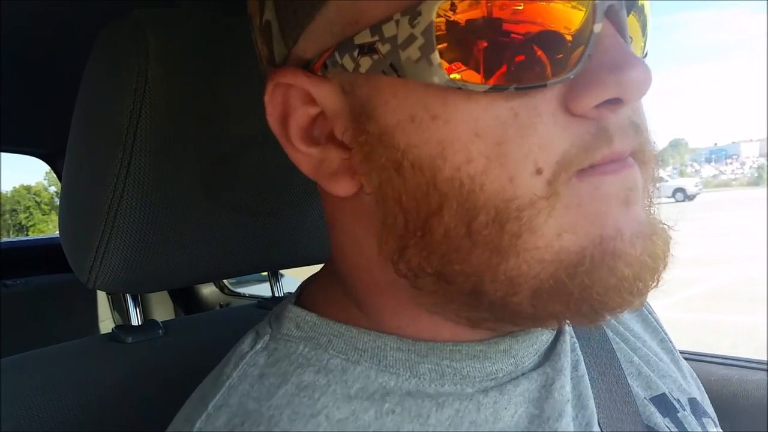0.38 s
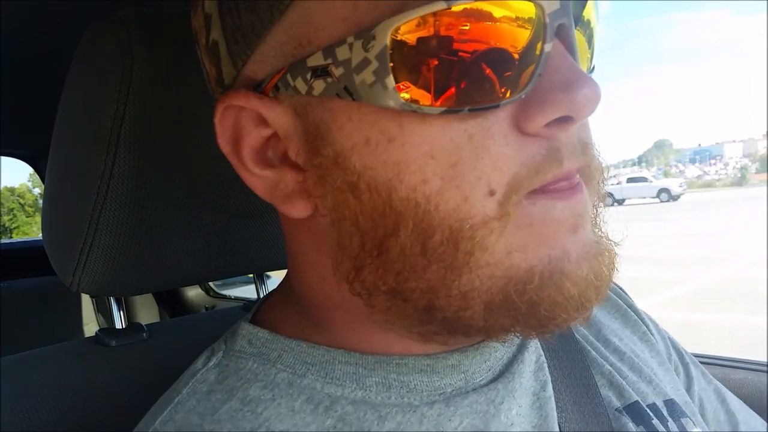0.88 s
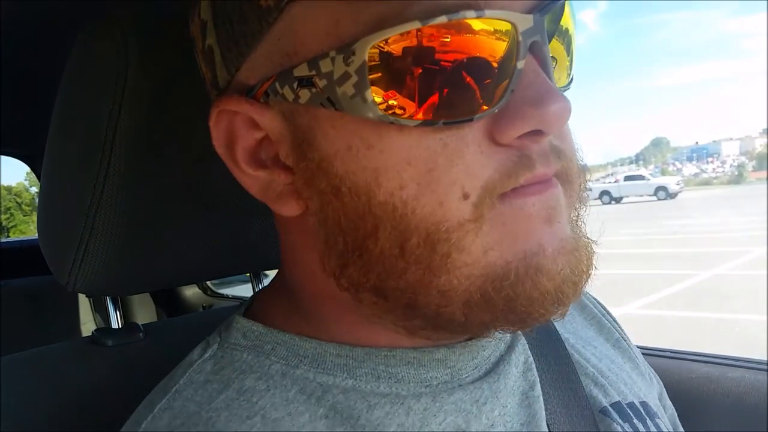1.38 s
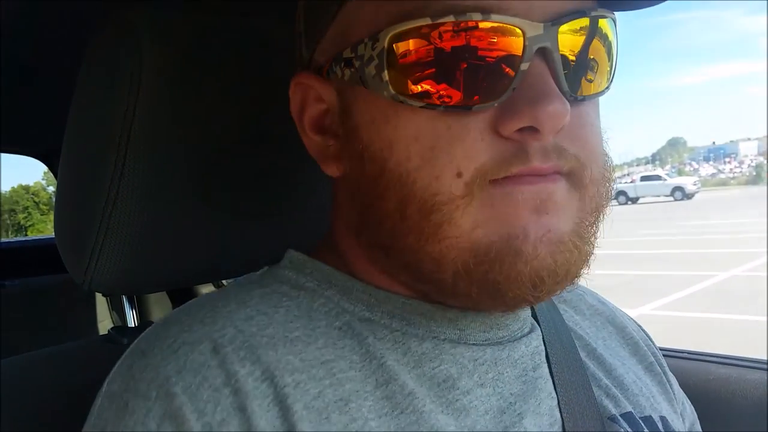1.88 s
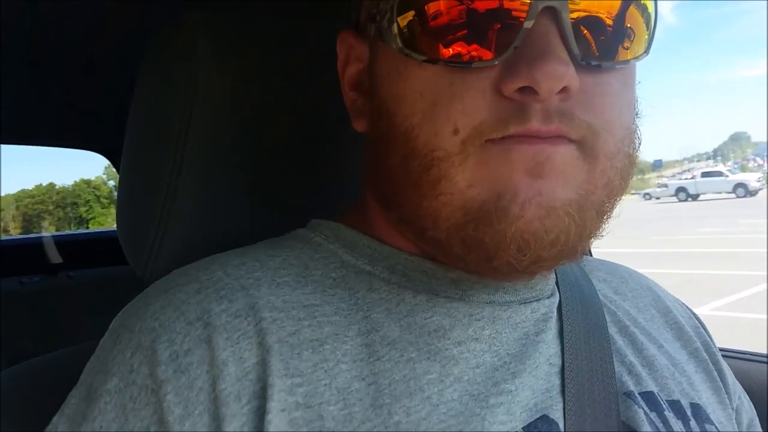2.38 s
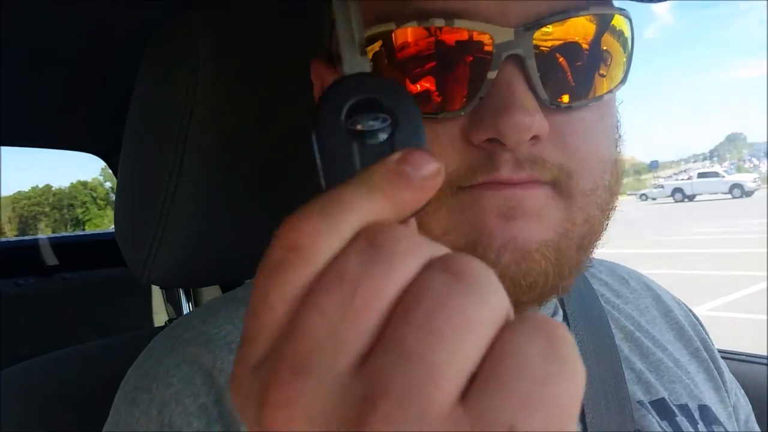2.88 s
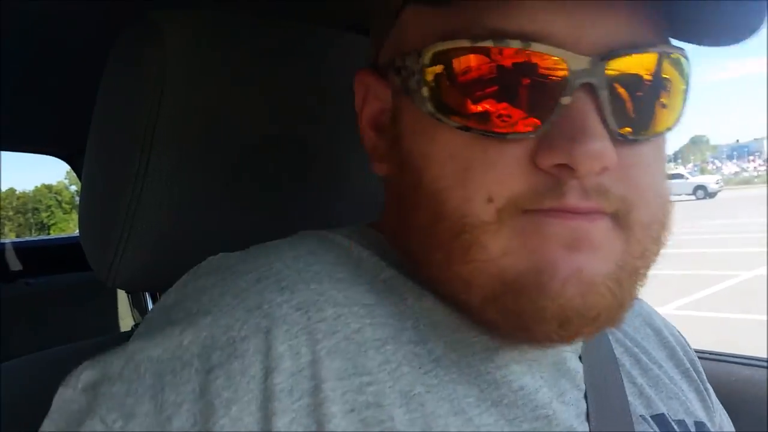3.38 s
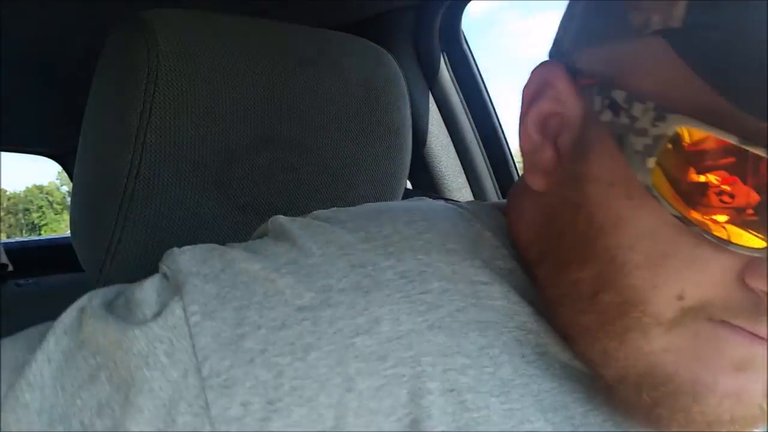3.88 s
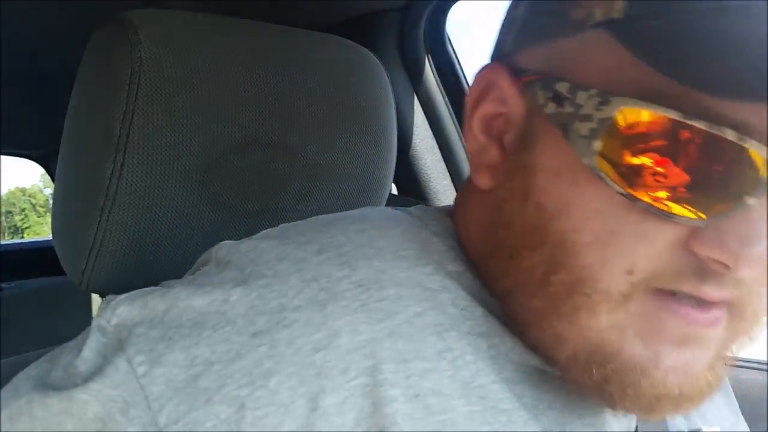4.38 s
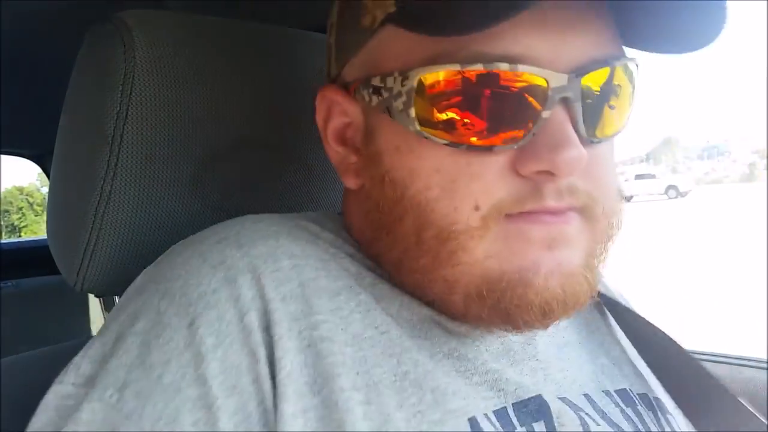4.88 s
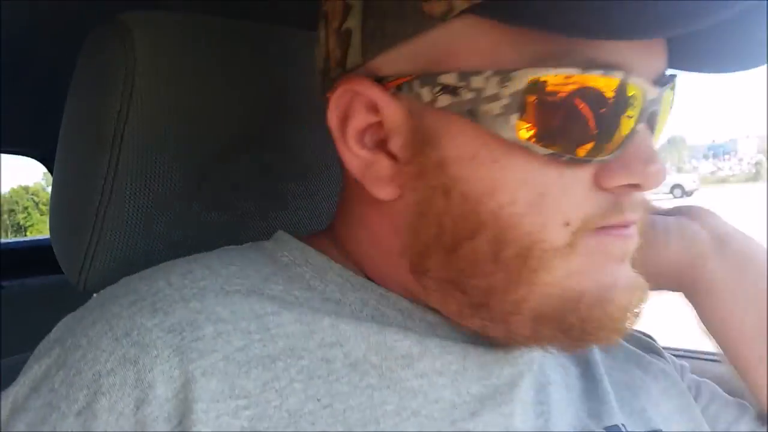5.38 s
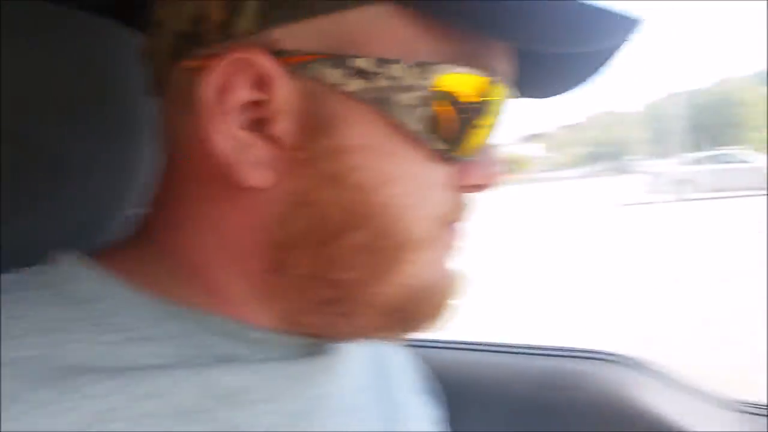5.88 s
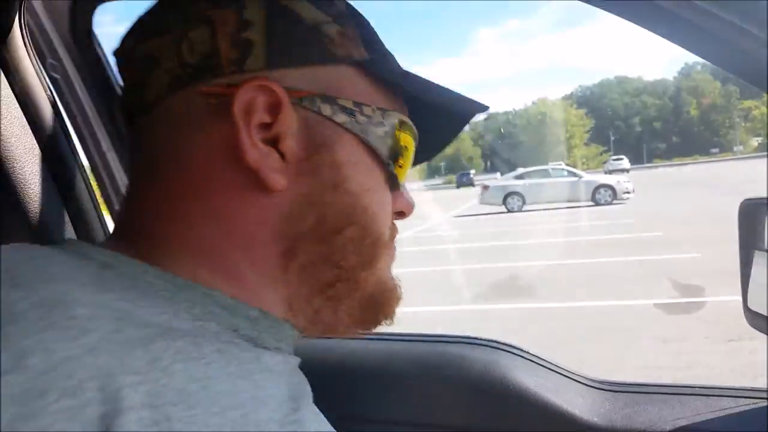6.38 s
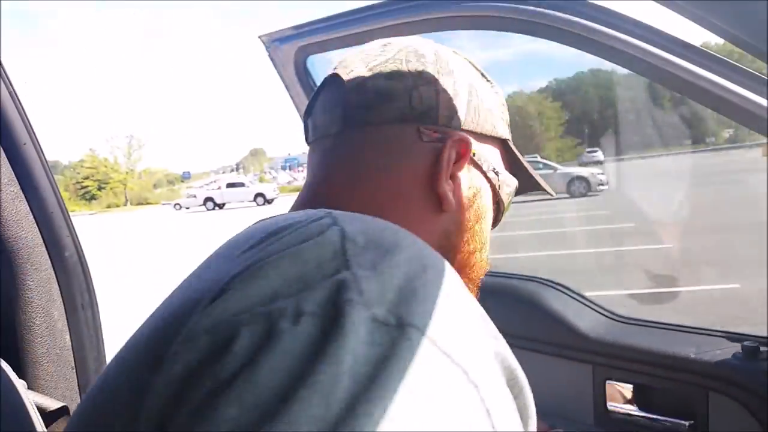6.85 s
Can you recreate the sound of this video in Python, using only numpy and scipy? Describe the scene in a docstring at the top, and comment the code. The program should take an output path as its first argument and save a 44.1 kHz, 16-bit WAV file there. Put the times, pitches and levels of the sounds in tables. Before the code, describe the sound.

Low rumble and wind buffeting in a parked truck cab fade to quiet, then clicks, knocks, a loud buckle clunk and a door latch opening.

```python
"""A low rumble inside a parked truck cab, with air buffeting the right of two phone ports, dies away first.
Trim, belt and latch click and knock as someone shifts, the belt buckle jumps free, cloth hisses near the right
port, and the door latch lets go. Boom, seat rustle, cloth and cab air are filtered noise under level curves;
puffs are short pressure swings; knocks, buckle and small parts are decaying modes; clicks are noise bursts."""
import sys
import numpy as np
from scipy import signal
from scipy.fft import rfft, irfft
from scipy.io import wavfile
from scipy.ndimage import uniform_filter1d, minimum_filter1d

SR = 44100
rng = np.random.default_rng(int(sys.argv[2]) if len(sys.argv) > 2 else 0)


def wrap_up_sound(samples):
    """Save the sound to the file named by the first command line argument, as 16-bit audio."""
    columns = np.atleast_2d(samples).T
    # keep every value between -1 and 1, then stretch to whole-number steps
    tamed = np.clip(columns, -1, 1)
    steps = np.round(tamed * 32767).astype(np.int16)
    wavfile.write(sys.argv[1], SR, steps)


def linear_from_db(decibels):
    """Turn decibels (scalar or array-like) into linear amplitude factors; 0 gives 1."""
    return 10 ** (np.asarray(decibels, float) / 20)


N = 319284   # samples


def rms_one(x):
    """Scales a signal to rms 1."""
    return x / np.sqrt(np.mean(x ** 2) + 1e-20)


def in_time(rows):
    """Draws each column of a table as a curve over the scene, straight between its points."""
    time_s, *columns = np.transpose(rows)
    return [np.interp(np.arange(N) / SR, time_s, column) for column in columns]


def at_hz(points, hz):
    """Reads a spectrum table, straight between its points on a log frequency axis."""
    points = np.array(points)
    return np.interp(np.log(hz), np.log(np.maximum(points[:, 0], 1)), points[:, 1])


def coloured(x, spectrum, tilt=((1, 0), (2, 0)), share=0, size=8192):
    """Causal (minimum-phase) filter with the given spectrum; unit gain for white noise before the tilt."""
    hz = np.maximum(np.arange(size // 2 + 1) * SR / size, 1)
    level_db = np.maximum(at_hz(spectrum, hz), -90)
    level_db = level_db - 10 * np.log10(np.mean(linear_from_db(2 * level_db)))
    level_db = level_db + share * at_hz(tilt, hz)
    # folding the cepstrum onto positive time gives minimum phase
    cepstrum = irfft(np.log(linear_from_db(level_db)))
    cepstrum[1:size // 2] *= 2
    cepstrum[size // 2 + 1:] = 0
    impulse = irfft(np.exp(rfft(cepstrum)))
    return signal.fftconvolve(x, impulse)[:N]


def drift(rate_hz):
    """Slow random wander of rms 1: noise through two equal poles, drawn at every 40th sample."""
    r = np.exp(-80 * np.pi * rate_hz / SR)
    noise = rng.standard_normal(N // 40 + 2002)
    slow = signal.lfilter([1], [1, -2 * r, r * r], noise)[2000:]
    return np.interp(np.arange(N) / 40, np.arange(len(slow)), rms_one(slow))


def panned(pan_db):
    """Left and right gains of constant total power; pan_db is L-R."""
    left_power = 1 / (1 + linear_from_db(-2 * np.asarray(pan_db)))
    return np.sqrt(2 * np.array([left_power, 1 - left_power]))


def noise_pair(alike):
    """Two white noises that share the power fraction alike."""
    common, own = rng.standard_normal(N), rng.standard_normal((2, N))
    return np.sqrt(alike) * common + np.sqrt(1 - alike) * own


def ring(x, hz, t60_s):
    """Two-pole resonator: a unit click sets a decaying sine of starting height 1 ringing."""
    r, w = linear_from_db(-60 / (t60_s * SR)), 2 * np.pi * hz / SR
    return signal.lfilter([0, np.sin(w)], [1, -2 * r * np.cos(w), r * r], x)


def add(out, start_s, sound, pan_db):
    """Lays one event into both ports."""
    at = round(start_s * SR)
    out[:, at:at + sound.shape[-1]] += panned(pan_db)[:, None] * sound[..., :N - at]


# where the phone faces, as the side on which the cab sounds: time_s, left_minus_right_db
FACING = [(0.0, -12.5), (0.8, -8), (1.0, -1), (2.45, 2.5), (2.7, 3), (3.8, 0), (4.1, 9.5), (4.6, 6.5),
          (4.75, -5), (5.25, 2), (5.35, 12), (6.22, 13), (6.3, 1), (6.75, -0.5), (6.8, 4), (7.24, 3.5)]


def facing_db():
    """L-R level of cab sounds as the phone turns."""
    return in_time(FACING)[0]


def swell(top_s, level_db, rise_s, fall_s, drop_db=20):
    """Power that climbs and sinks evenly in dB, by drop_db over each of rise_s and fall_s."""
    t = np.arange(N) / SR - top_s
    return linear_from_db(2 * (level_db - drop_db * np.maximum(-t / rise_s, t / fall_s)))


# steady boom, dying away to a murmur and back when the door opens: time_s, level_db
BOOM_LEVEL = [(0.0, -25.5), (0.85, -33), (1.3, -36.5), (1.57, -41.5), (2.5, -47), (3.08, -58.5), (3.2, -49),
              (3.65, -73), (4.05, -69), (4.45, -62), (4.7, -55), (5.26, -50), (5.32, -70), (5.5, -52),
              (5.92, -58.5), (6.2, -70), (6.4, -35.5), (7.24, -45)]
# boom under a gust or a shift of weight: top_s, level_db, rise_s, fall_s, left_minus_right_db
BOOM_SWELLS = [(0.14, -22, 0.19, 0.42, -24), (0.34, -12, 0.018, 0.034, -32), (0.46, -18, 0.16, 0.058, -27),
               (0.579, -16, 0.057, 0.042, -13), (0.66, -22.5, .1, 0.12, -22),
               (0.81, -23.5, 0.19, 0.084, -25), (0.99, -21.5, 0.17, 0.22, -2), (1.27, -26.5, 0.4, 0.22, -6),
               (1.43, -22, 0.039, 0.083, -28), (2.438, -29.5, 0.23, 0.052, -1.5),
               (3.37, -44.5, .08, 0.43, 0), (3.85, -40.5, 0.18, 0.97, -0.5), (4.23, -39.5, 0.2, 0.078, 10),
               (4.419, -32, 0.086, 0.036, 5), (4.58, -39, 0.13, 0.18, 3.5), (5.379, -31.5, 0.027, 0.07, 14),
               (5.97, -47.5, 0.02, .24, -2), (6.33, -20, 0.042, 0.07, 0), (6.63, -34, 0.64, 0.2, -2),
               (7.0, -36, 0.18, 0.23, 13)]


def boom_control(turn_db, turn_share=0.56):
    """Level and side of the boom: the steady part plus every swell, added as powers in each port."""
    power = linear_from_db(2 * in_time(BOOM_LEVEL)[0]) * panned(turn_share * turn_db) ** 2
    for *shape, pan_db in BOOM_SWELLS:
        power = power + swell(*shape) * panned(pan_db)[:, None] ** 2
    level_db = 10 * np.log10(power.mean(axis=0))
    pan_db = 10 * np.log10(power[0] / power[1])
    return level_db, pan_db


# boom spectrum, relative: frequency_hz, density_db
RUMBLE_SPECTRUM = [(12, -23), (20, -7.5), (54, -3.5), (102, 3.5), (188, -8.5), (221, -10), (260, -16.5),
                   (340, -19), (570, -120)]


def rumble(level_db, pan_db, alike=0.44, steady=0.38, gain_db=-1.5):
    """Boom of the cab and buffeting air, partly own to each port; steadier in strength than plain noise."""
    pair = np.array([coloured(x, RUMBLE_SPECTRUM) for x in noise_pair(alike)])
    strength = np.sqrt(uniform_filter1d(pair ** 2, size=1300, axis=1) + 1e-3)
    return linear_from_db(level_db + gain_db) * panned(pan_db) * pair / strength ** steady


# strongest air puffs on the right port; edge is relative to swing: top_s, level_db, edge_db
AIR_PUFFS = [(0.08, -19, -20), (0.1357, -24.5, -3.5), (0.1608, -17.5, -28), (0.2395, -14, -11),
             (0.279, -15.5, -8.5), (0.334, -15.5, -10), (0.3558, -21.5, -1.5), (0.372, -18, -9),
             (0.4556, -13, -7.5), (0.5062, -29, -11), (0.5784, -19.5, -20), (0.6286, -17.5, -1),
             (0.6363, -14.5, 7.5), (0.663, -15.5, -8), (0.706, -22, -28), (0.7646, -21, -17),
             (0.7976, -20, -26), (0.807, -16.5, -5), (1.4144, -28, -32), (1.4411, -31.5, -35)]


def puffs(swing_hz=315, scatter=0.2, swing_s=0.0018, edge_hz=700, edge_s=0.00052, pan_db=-22):
    """Pressure spikes that build and collapse within a few swings, with a brighter edge at the top."""
    out, t = np.zeros((2, N)), np.arange(-600, 600) / SR
    # a weaker, duller puff just before and just after each
    flutter_s, flutter_db, flutter_edge_db = 0.0104, -10.5, -4.5
    gaps_s = flutter_s * rng.uniform(0.797, 1.4, (len(AIR_PUFFS), 2)) * [-1, 1]
    every = [*AIR_PUFFS]
    for (top_s, level_db, edge_db), pair_s in zip(AIR_PUFFS, gaps_s):
        for gap_s in pair_s:
            every.append((top_s + gap_s, level_db + flutter_db, edge_db + flutter_edge_db))
    for (top_s, level_db, edge_db), draw in zip(every, rng.standard_normal((len(every), 4))):
        swing = np.cos(2 * np.pi * swing_hz * (1 + scatter * draw[0]) * t + 0.5 * draw[1])
        swing = swing / (1 + (t / swing_s) ** 2)
        edge = np.cos(2 * np.pi * edge_hz * (1 + scatter * draw[2]) * t + 0.5 * draw[3])
        edge = edge / (1 + (t / edge_s) ** 2)
        add(out, max(top_s + t[0], 0), -linear_from_db(level_db) * (swing + linear_from_db(edge_db) * edge), pan_db)
    return out


# modes of the freed belt buckle: frequency_hz, level_db (relative), t60_s
BUCKLE_MODES = [(189, -14, 0.032), (413, 8.5, 0.017), (498, -9, 0.031), (750, -1, 0.028), (880, -11, 0.023),
                (1220, -19, 0.025), (1505, -19, 0.024), (2065, -43, 0.13), (3740, -43.5, 0.14),
                (3820, -29, 0.034)]


def buckle(start_s=5.3238, level_db=-0.5, pan_db=10, build_s=0.0019):
    """The steel tongue jumps free of its plastic housing; the ring builds over the first swings."""
    out, t = np.zeros((2, N)), np.arange(9000) / SR
    sound = np.zeros(len(t))
    for k, (hz, mode_db, t60_s) in enumerate(BUCKLE_MODES):
        sign = (-1) ** k
        sound += sign * linear_from_db(mode_db - 60 * t / t60_s) * np.sin(2 * np.pi * hz * t)
    sound *= 1 - np.exp(-(t / build_s) ** 2)
    add(out, start_s, linear_from_db(level_db) * sound / np.abs(sound).max(), pan_db)
    return out


# dull knocks on trim, seat and door; t60 is of the shaking:
# start_s, level_db, pitch_hz, trim_db (relative to the low part), t60_s
DULL_KNOCKS = [(0.16, -21.5, 177, -9, 0.085), (0.366, -22, 170, -26, 0.051), (0.519, -23, 244, -3, 0.054),
               (1.134, -20.5, 227, -18, 0.06), (1.24, -37.5, 167, 5.5, 0.032), (1.533, -33, 170, 0, 0.14),
               (1.734, -55, 218, 13.5, 0.058), (1.943, -41, 350, -7, 0.19), (2.186, -36.5, 236, -29, 0.054),
               (2.233, -36, 237, -6, 0.026), (2.263, -29.5, 224, -40, 0.083),
               (2.312, -24.5, 179, -43, 0.098), (2.675, -41, 222, -6.5, 0.12), (2.72, -53.5, 168, 8, 0.26),
               (3.1218, -29, 207, 4.5, 0.18), (3.353, -47, 182, -11, 0.22), (3.754, -42.5, 175, -23, 0.068),
               (3.809, -36, 179, 4, 0.11), (3.868, -33.5, 314, -6, 0.23), (3.908, -47, 348, 8, 0.099),
               (4.1, -42, 169, -6, 0.16), (4.183, -37.5, 203, -9, 0.1), (4.203, -43.5, 188, 0.5, 0.042),
               (4.227, -34.5, 164, -24, 0.042), (4.294, -49.5, 490, 4, 0.083),
               (4.398, -31.5, 239, 0.5, 0.068), (4.516, -44, 208, -1, 0.16), (4.597, -44.5, 194, -4, 0.073),
               (5.338, -32.5, 204, 0, 0.14), (5.391, -38.5, 250, -8, 0.058), (5.43, -47, 220, -10, 0.038),
               (5.553, -43, 191, -10, 0.059), (5.892, -50, 213, -2, 0.15), (6.209, -36.5, 230, -3.5, 0.085),
               (6.303, -23, 212, -9, 0.079), (6.322, -26.5, 168, -16, 0.1), (6.448, -39, 288, 4, 0.12),
               (6.47, -34, 337, -1.5, 0.16), (6.5, -37.5, 304, -2, 0.15), (6.532, -32, 236, -1, 0.098),
               (6.6035, -18.5, 216, -7, 0.1), (6.6165, -19.5, 188, -28, 0.16),
               (6.688, -34, 432, -20, 0.029), (6.744, -35.5, 170.4, -6, 0.044),
               (6.789, -34, 223, -20, 0.11), (6.998, -35.5, 95, -28, .07), (7.086, -32, 132, -17, 0.074)]
# damped trim modes: frequency_hz, level_db (relative), t60_s
TRIM_MODES = [(347, 6, 0.016), (534, 1.5, 0.033), (664, -1.5, 0.034), (770, 6, 0.021), (905, -4.5, 0.052),
              (1000, -17, 0.035), (1240, -21, 0.026), (1526, -8.5, 0.021)]


def knocks(turn_db, alike=0.68, rattle_db=-25, soft_hz=1300, own_share=0.27, thud_db=-12, thud_hz=100,
           tail_db=-16, tail_stretch=2.0, build_s=0.0021, gain_db=6.5):
    """One soft blow and a dying rattle drive the struck part, the damped trim modes and the boom of the cab."""
    out, t = np.zeros((2, N)), np.arange(14000) / SR
    n = len(t)
    soft = signal.butter(2, [80, soft_hz], "band", fs=SR, output="sos")
    draws = rng.standard_normal((len(DULL_KNOCKS), 3, n + len(TRIM_MODES)))
    for (start_s, level_db, pitch_hz, trim_db, t60_s), draw in zip(DULL_KNOCKS, draws):
        # the panels go on shaking faintly
        shake = linear_from_db(-60 * t / t60_s) + linear_from_db(tail_db - 60 * t / (tail_stretch * t60_s))
        rattle = np.sqrt(alike) * draw[0, :n] + np.sqrt(1 - alike) * draw[1:, :n]
        contact = rattle * shake * linear_from_db(rattle_db)
        contact[:, 0] = -1   # the blow
        contact = signal.sosfilt(soft, contact)
        struck = rms_one(ring(contact, pitch_hz, own_share * t60_s))
        thud = rms_one(ring(contact, thud_hz, t60_s))
        low = struck + linear_from_db(thud_db) * thud
        spot_db = 3 * draw[0, n:]   # every blow lands on another spot
        trim = sum(linear_from_db(mode_db + d) * ring(contact, hz, ring_s)
                   for (hz, mode_db, ring_s), d in zip(TRIM_MODES, spot_db))
        build = 1 - np.exp(-(t / build_s) ** 2)   # the contact takes a moment to close
        low, trim = low * build, trim * build
        sound = low / np.abs(low).max() + linear_from_db(trim_db) * trim / np.abs(trim).max()
        add(out, start_s, linear_from_db(level_db + gain_db) * sound, turn_db[round(start_s * SR)])
    return out


# small parts ringing once (key, belt fittings, door trim): start_s, level_db, pitch_hz, t60_s
SMALL_PARTS = [(0.522, -20, 520, 0.049), (1.134, -22.5, 523, 0.05), (0.516, -42, 5370, .03),
               (1.535, -32, 3740, 0.02), (2.495, -36.5, 2260, 0.032), (2.497, -32.5, 1880, 0.029),
               (3.126, -30, 514, 0.041), (3.1265, -17.5, 812, 0.044), (3.128, -16, 1052, 0.055),
               (3.129, -40, 3600, 0.045), (3.132, -34, 1420, 0.054), (4.396, -32, 810, 0.059),
               (4.398, -33, 3440, 0.026), (4.599, -38, 830, 0.078), (4.75, -48.5, 674, 0.29),
               (4.803, -48, 684, 0.22), (4.878, -48, 664, 0.38), (4.895, -45, 524, 0.22),
               (4.974, -37.5, 790, 0.1), (5.052, -42.5, 498, 0.08), (5.18, -45.5, 347, 0.33),
               (6.309, -26, 905, 0.055), (6.404, -42, 865, 0.28), (6.449, -31, 1060, .08),
               (6.468, -31, 495, 0.11), (6.535, -35, 746, 0.07), (6.604, -24, 720, 0.047),
               (6.665, -35, 443, 0.099), (6.744, -27.5, 600, 0.052), (6.744, -30, 880, 0.054),
               (6.784, -32, 616, 0.058), (6.898, -42, 464, 0.14), (6.96, -34.5, 520, 0.085),
               (7.021, -42.5, 499, 0.21), (7.081, -43, 562, 0.14), (7.14, -36, 490, 0.08),
               (6.686, -35, 893, .06)]


def pings(build_s=0.0019, pan_db=5.0):
    """One dying sine each, building over the first swings."""
    out, t = np.zeros((2, N)), np.arange(9000) / SR
    for (start_s, level_db, pitch_hz, t60_s), phase in zip(SMALL_PARTS, rng.random(len(SMALL_PARTS))):
        note = linear_from_db(level_db - 60 * t / t60_s) * np.sin(2 * np.pi * (pitch_hz * t + phase))
        add(out, start_s, note * (1 - np.exp(-(t / build_s) ** 2)), pan_db)
    return out


# bright clicks, each a rattle of contacts: start_s, level_db, low_db (gain of low part), ring_hz, length_s
BRIGHT_CLICKS = [(0.136, -36.5, -1, 1900, 0.013), (0.152, -30.5, -1.5, 2310, 0.021),
                 (0.346, -31.5, -1, 2090, 0.022), (0.5002, -20.5, -10, 2830, 0.011),
                 (0.511, -24.5, -6, 4430, 0.018), (0.576, -32, -1.5, 5030, 0.0049),
                 (0.939, -38.5, -3.5, 1930, 0.012), (1.0428, -26.5, -11, 4480, 0.017),
                 (1.071, -37, -2.5, 2010, 0.023), (1.127, -51, 5, 1920, 0.015),
                 (1.1986, -38, -11, 2660, 0.01), (1.2305, -26.5, -6.5, 2110, 0.014),
                 (1.459, -44, -26, 2500, 0.026), (1.497, -41, -5, 2500, 0.018),
                 (1.5134, -29.5, -4.5, 4200, 0.023), (1.534, -22.5, -2, 4000, 0.014),
                 (1.709, -51, 9, 2170, 0.023), (2.229, -52.5, 6.5, 2030, 0.012),
                 (2.493, -40.5, 0.5, 2150, 0.012), (2.767, -52, -16, 4150, 0.017),
                 (2.786, -47, -11, 3850, 0.025), (3.1249, -27.5, -0.5, 1960, 0.013),
                 (4.007, -45.5, -7, 4530, 0.02), (4.224, -47, -22, 3220, 0.0062),
                 (4.3936, -26.5, -2, 3370, 0.01), (4.398, -20.5, -11, 2460, 0.005),
                 (4.51, -47.5, 2, 1900, 0.016), (4.552, -39, -1.5, 3080, 0.007),
                 (5.137, -43.5, -8, 2120, 0.055), (5.284, -40.5, 2, 1940, 0.0091),
                 (5.3233, -41.5, 24.5, 2240, 0.0049), (5.375, -49.5, 10, 2600, 0.0036),
                 (6.203, -70, 18.5, 1960, 0.021), (6.236, -52, -5, 2850, 0.01),
                 (6.269, -48.5, -5, 2200, 0.013), (6.2997, -45.5, 1.5, 2050, 0.047),
                 (6.444, -45, 7, 2370, 0.05), (6.526, -46.5, 9.5, 3000, 0.016),
                 (6.6039, -23.5, 2, 3280, 0.0067), (6.609, -35, 3, 2860, 0.015),
                 (7.21, -50.5, 3, 2540, 0.034)]
# low part of a click, relative: frequency_hz, density_db
CLICK_LOW_SPECTRUM = [(600, 0), (1000, 7), (1500, -0.5), (2200, -1), (3000, 0), (3800, 1), (4800, -12.5),
                      (6000, -13.5), (8000, -47)]
# bright part of a click, relative: frequency_hz, density_db
CLICK_HIGH_SPECTRUM = [(2650, -46), (4500, -4.5), (5670, -6.5), (7470, -7.5), (8180, -6), (10800, 0.5),
                       (11500, -2.5), (12400, -2.5), (15300, -4), (16300, -11)]
# treble difference of the ports, also heard on cloth: frequency_hz, left_minus_right_db
PORT_TILT = [(4500, 20), (6500, 15.5), (8200, 5.5), (10500, -11), (13000, -7), (16000, 3)]


def clicks(grain_db=3.5, grain_s=0.001, alike=0.12, tail_db=-16, tail_s=0.018, rise_s=0.00068,
           ring_db=-25, ring_s=0.0086, low_pan_db=-3.0, high_pan_db=-16, gain_db=-9):
    """A burst of contacts rings a small part, holds briefly, then dies with a short cab tail."""
    low, high, t = np.zeros((2, N)), np.zeros((2, N)), np.arange(8000) / SR
    draws = rng.standard_normal((len(BRIGHT_CLICKS), 4, len(t)))
    for (start_s, level_db, low_db, hz, length_s), draw in zip(BRIGHT_CLICKS, draws):
        shape = np.minimum(t / rise_s, 1) * np.exp(-(t / length_s) ** 2)
        shape = shape + linear_from_db(tail_db) * np.exp(-t / tail_s)
        contacts = np.sqrt(alike) * draw[0] + np.sqrt(1 - alike) * draw[1:3]
        lumps = rms_one(uniform_filter1d(draw[3], size=round(grain_s * SR)))   # contacts come in clumps
        settle = np.minimum(t / length_s, 1)   # the first contact is firm, the later ones uneven
        burst = contacts * linear_from_db(grain_db * lumps * settle + level_db + gain_db) * shape
        add(high, start_s, burst, high_pan_db)
        add(low, start_s, linear_from_db(low_db) * (burst + linear_from_db(ring_db) * ring(burst, hz, ring_s)), low_pan_db)
    return np.array([coloured(a, CLICK_LOW_SPECTRUM) + coloured(b, CLICK_HIGH_SPECTRUM, PORT_TILT, side)
                     for a, b, side in zip(low, high, (0.5, -0.5))])


# how much the body stirs in the seat: time_s, level_db
STIR_LEVEL = [(0.0, -39), (0.16, -43.5), (0.6, -42.5), (1.19, -44), (1.45, -53.5), (2.3, -48), (2.7, -56.5),
              (3.15, -73), (3.27, -56), (3.77, -58), (4.01, -53), (4.44, -63.5), (4.64, -50.5), (5.4, -52),
              (5.53, -62.5), (6.05, -53.5), (6.23, -58), (6.51, -44), (7.04, -47.5), (7.24, -41)]
# rustle through the panels, relative: frequency_hz, density_db
BODY_SPECTRUM = [(71, -41), (120, -10.5), (156, -7.5), (220, -8.5), (265, -12), (445, -13.5), (530, -14),
                 (610, -17), (882, -16), (1170, -29.5), (1600, -31), (2080, -40), (3520, -120)]


def body(turn_db, alike=0.47, seat_pan_db=2, turn_share=0.48, gain_db=-2):
    """Seat and trim rustle under shifting weight: uneven noise through the panels."""
    level_db = in_time(STIR_LEVEL)[0]
    pan_db = seat_pan_db + turn_share * turn_db
    uneven = linear_from_db(2.68 * drift(45) + 3.0 * drift(10.9))
    pair = np.array([coloured(x * uneven, BODY_SPECTRUM) for x in noise_pair(alike)])
    return linear_from_db(level_db + gain_db) * panned(pan_db) * pair


# strokes of fabric: top_s, level_db, rise_s, fall_s
CLOTH_STROKES = [(0.75, -59, 0.043, 0.68), (0.97, -62, 0.72, 0.048), (1.43, -63, 0.26, 0.21),
                 (2.12, -65, 1.14, 0.77), (2.7, -75, 0.35, 0.43), (3.65, -60, 0.39, 0.59),
                 (3.95, -59, 0.39, 0.52), (4.62, -61, 0.13, 0.52), (4.82, -57.5, 0.28, 0.5),
                 (5.24, -66.5, 0.2, 0.47), (5.89, -71.5, 0.49, 0.53), (6.58, -48.5, 0.23, 0.34),
                 (6.8, -61.5, 0.35, 1)]
# fabric hiss, relative: frequency_hz, density_db
CLOTH_SPECTRUM = [(4120, -18.5), (7000, -7.5), (8060, -12.5), (9970, -4.5), (11200, -3.5), (13400, -5.5),
                  (15200, -3.5), (15800, -22), (16300, -37)]


def cloth(air_db, rest_db=-37, alike=0.23, flicker_db=1.5, pan_db=-16, gain_db=2.0):
    """Fabric sliding near the right port: flickering noise in strokes, over a rest level set by the cab air."""
    power = linear_from_db(2 * (air_db + rest_db)) + sum(swell(*row) for row in CLOTH_STROKES)
    level_db = 10 * np.log10(power)
    pair = noise_pair(alike) * linear_from_db(flicker_db * drift(39))
    pair = np.array([coloured(x, CLOTH_SPECTRUM, PORT_TILT, side) for x, side in zip(pair, (0.5, -0.5))])
    return linear_from_db(level_db + gain_db) * panned(pan_db)[:, None] * pair


# cab air: time_s, level_db
AIR_LEVEL = [(0.0, -60), (1.0, -61.5), (2.7, -62.5), (3.17, -69), (3.55, -59.5), (4.0, -61.5), (5.0, -59.5),
             (5.51, -70.5), (6.25, -71), (6.53, -55), (6.68, -60), (7.24, -59)]


def airflow_db():
    """Level of the cab air over time."""
    return in_time(AIR_LEVEL)[0]


# cab air, relative: frequency_hz, density_db
AIR_SPECTRUM = [(650, -26), (1100, 4), (1680, -1), (1990, 3.5), (2520, 1.5), (3120, 1.5), (3570, -3.5),
                (4310, 0), (5220, -7.5), (7220, -16), (8360, -13.5), (10100, -17.5), (11300, -9),
                (15100, -10), (16000, 1.5)]
# colour difference of the ports for air: frequency_hz, left_minus_right_db
AIR_TILT = [(1290, 3), (2380, -1), (4400, 11), (6500, 8), (8100, -0.5), (10500, -23.5), (13000, 0.5),
            (16000, -8)]


def air(level_db, alike=0.063, flicker_db=1.33, gain_db=3.5):
    """Smooth cab air as gently flickering noise; each port colours it in its own way."""
    pair = noise_pair(alike) * linear_from_db(flicker_db * drift(20.0))
    pair = np.array([coloured(x, AIR_SPECTRUM, AIR_TILT, side) for x, side in zip(pair, (0.5, -0.5))])
    return linear_from_db(level_db + gain_db) * pair


def scene():
    """All layers; sound reaches the left port a little late."""
    turn_db, air_db = facing_db(), airflow_db()
    cab = rumble(*boom_control(turn_db)) + puffs()
    cab = cab + buckle() + knocks(turn_db) + pings() + clicks()
    cab = cab + body(turn_db) + cloth(air_db) + air(air_db)
    left_lag = 21   # samples
    return np.array([np.pad(cab[0], (left_lag, 0))[:N], cab[1]])


def roll_off(x):
    """The treble ends steeply here."""
    return signal.sosfilt(signal.butter(12, 16970, fs=SR, output="sos"), x)


def record(dry):
    """A limiter lowers both ports ahead of peaks above its limit; then the top is cut steeply."""
    limit, look_ahead_s, cutoff_hz = 0.46, 0.02, 16100
    ahead = round(look_ahead_s * SR)
    room = limit / np.maximum(np.abs(dry).max(axis=0), limit)
    gain = minimum_filter1d(room, size=ahead, origin=-(ahead // 2) + 88)   # holds for 2 ms after
    limited = dry * uniform_filter1d(gain, size=88)
    low_pass = signal.cheby2(16, 45, cutoff_hz, fs=SR, output="sos")
    mix = signal.sosfilt(low_pass, limited)
    return roll_off(mix)


dry = scene()
out = record(dry)
wrap_up_sound(out)
```